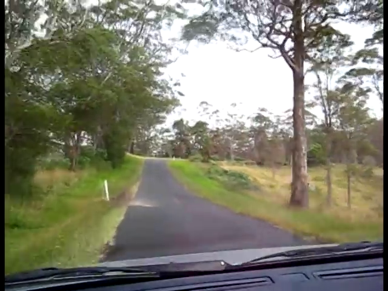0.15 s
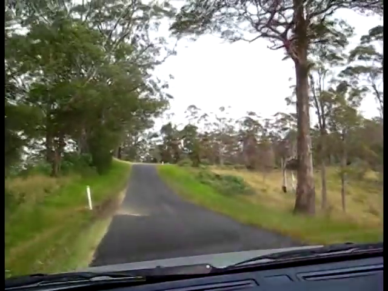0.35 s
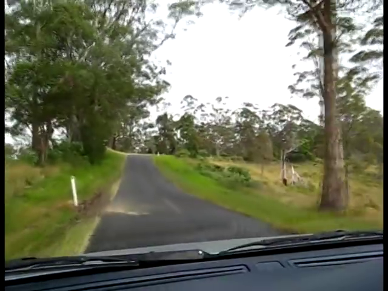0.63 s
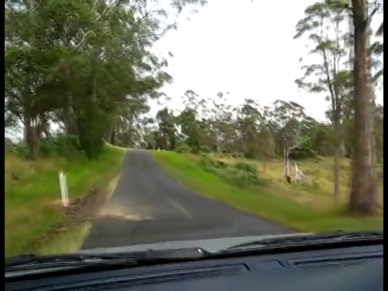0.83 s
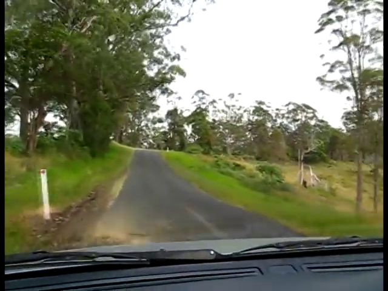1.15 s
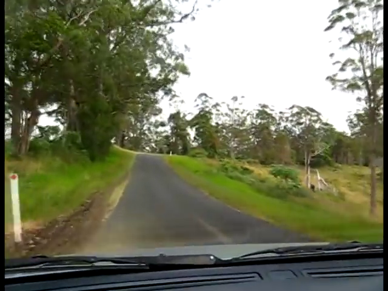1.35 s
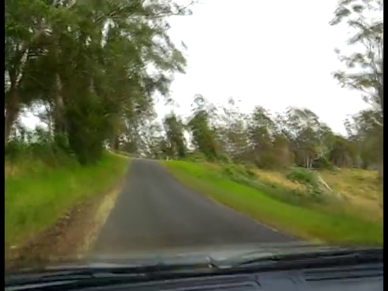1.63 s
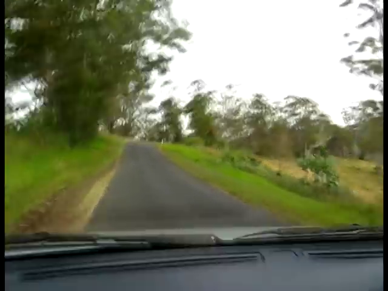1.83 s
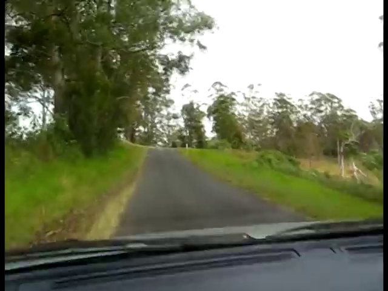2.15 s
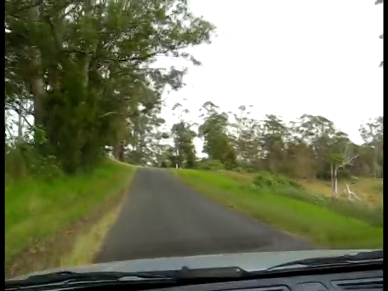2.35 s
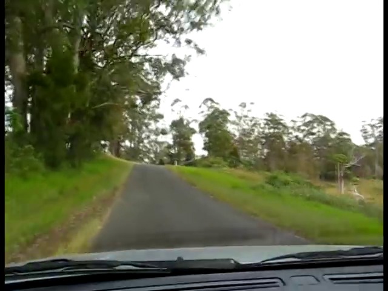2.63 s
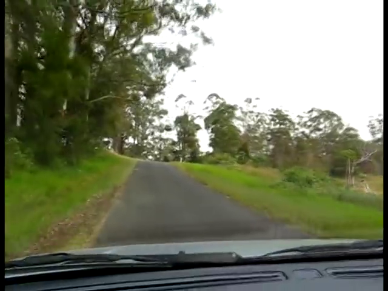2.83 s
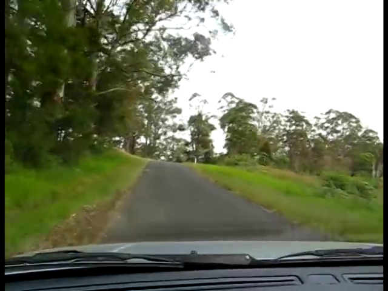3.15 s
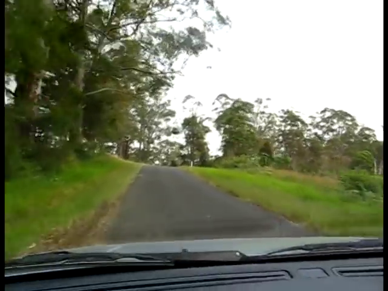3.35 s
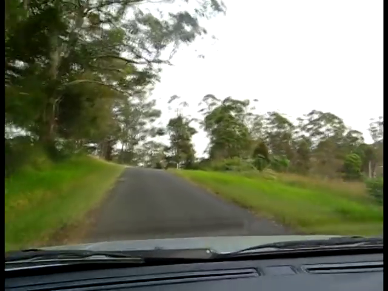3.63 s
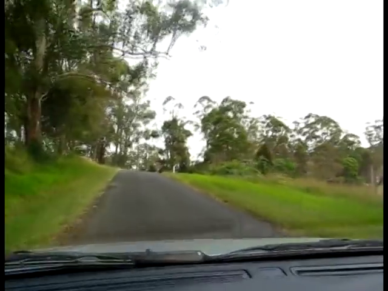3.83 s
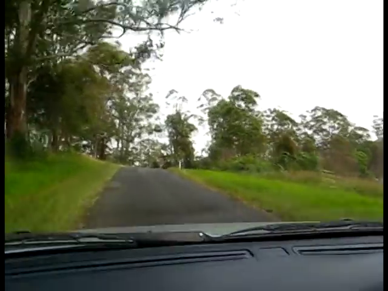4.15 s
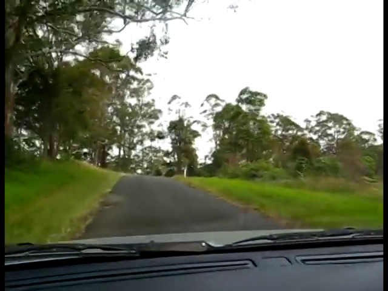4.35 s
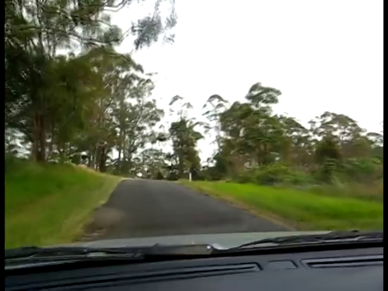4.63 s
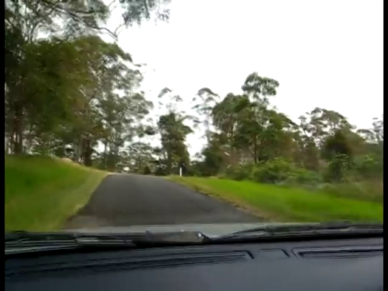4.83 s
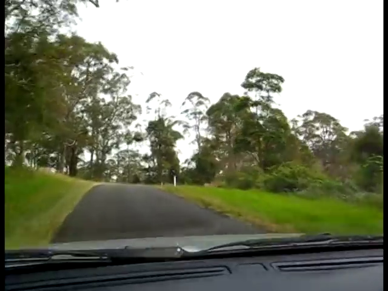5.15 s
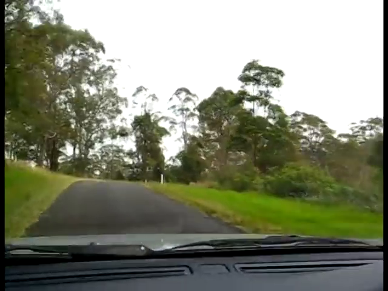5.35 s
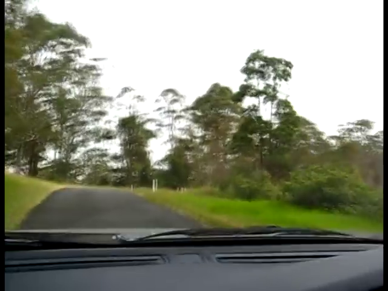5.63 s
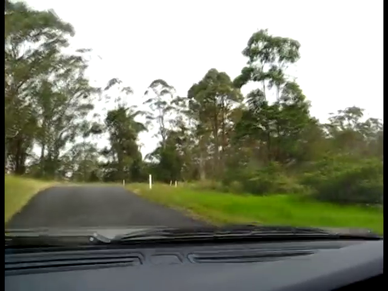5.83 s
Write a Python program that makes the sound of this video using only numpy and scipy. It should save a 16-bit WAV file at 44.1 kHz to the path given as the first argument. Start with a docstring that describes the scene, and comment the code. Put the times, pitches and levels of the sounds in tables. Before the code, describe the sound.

The sound is that of a small car's cabin on a country road, heard from the front seat for about six seconds. Deep body rumble, tyre roar on coarse asphalt and a low engine boom run throughout, with soft thuds from bumps and a faint hiss. At 0.4 seconds plastic clicks once, sharply and close by, and just before 1 second the dashboard ticks lightly. At about 1.6 seconds the wheels hit a rough patch: the tyres swell, hollow panels knock and loose trim rattles brightly, dying away just after 2 seconds. The overall level dips with the jolt and creeps back. From 2 seconds the engine grows louder and rises in pitch, with one more dull knock near 2.4 seconds. It drones steadily from 3 to 5 seconds, then eases off, with a faint rattle around 5.4 seconds and a last low swell.

```python
"""Inside a small car on a narrow country road, camera microphone at the front seat. From the start the
body rumbles, the tyres roar on coarse asphalt and the four-cylinder engine booms low. Close by, plastic
clicks once sharply, then the dashboard ticks. At about 1.6 s the wheels cross a rough patch: panels
knock, loose trim rattles, and the camera's gain control ducks and creeps back. After two seconds the
engine picks up and drones on up a rise, easing off shortly before the end."""
import sys
import numpy as np
from scipy import signal
from scipy.fft import rfft, irfft, next_fast_len
from scipy.io import wavfile
from scipy.ndimage import uniform_filter1d, map_coordinates

SR = 44100
rng = np.random.default_rng(int(sys.argv[2]) if len(sys.argv) > 2 else 0)


def unload_wav(signal):
    """Save mono or channel-first audio to the path in sys.argv[1] as 16-bit WAV at rate SR, clipped to [-1, 1]."""
    wavfile.write(
        sys.argv[1],
        SR,
        np.round(np.clip(np.atleast_2d(signal).T, -1, 1) * 32767).astype(np.int16),
    )


N = 263963


def amp(db):
    """Decibels to gain."""
    return 10 ** (np.asarray(db) / 20)


def unit(x):
    """Scale to rms 1."""
    return x / np.sqrt(np.mean(x ** 2) + 1e-20)


def curves(rows):
    """One value per sample for each column after the time."""
    times, *columns = np.transpose(rows)
    return [np.interp(np.arange(N) / SR, times, column) for column in columns]


def wobble(rate):
    """A smooth random curve, rate knots a second."""
    knots = rng.standard_normal(int(N * rate / SR) + 4)
    return map_coordinates(knots, [np.arange(N) * rate / SR])


def gain_at(spectrum, hz):
    """Gain between (frequency [Hz], level [dB]) points on a log axis."""
    points_hz, db = np.transpose(spectrum)
    return amp(np.interp(np.log(hz + 1), np.log(points_hz), db))


def filtered(x, response):
    """x through a complex response of frequency."""
    size = next_fast_len(N + SR // 2)
    return irfft(rfft(x, size) * response(np.fft.rfftfreq(size, 1 / SR)), size)[:N]


def coloured(x, spectrum):
    """x shaped by a spectrum and silent beyond its ends, at rms 1."""
    low_hz, high_hz = spectrum[0][0], spectrum[-1][0]
    return unit(filtered(x, lambda hz: gain_at(spectrum, hz) * (hz > low_hz) * (hz < high_hz)))


def noise(spectrum):
    """Noise with this spectrum, at rms 1."""
    return coloured(rng.standard_normal(N), spectrum)


def steady(x, span_s):
    """Even out swells of x that last longer than span_s."""
    power = np.abs(uniform_filter1d(x ** 2, int(span_s * SR)))
    return x / np.sqrt(power + 1e-6)


def lagged(x, seconds):
    """x followed with a time constant."""
    step = 1 - np.exp(-1 / (seconds * SR))
    return signal.lfilter([step], [1, step - 1], x)


def blows(hits):
    """One clean impulse for each (time [s], level [dB])."""
    times, db = np.transpose(hits)
    return np.bincount(np.round(times * SR).astype(int), amp(db), N)


def padded(x, corner_hz):
    """A soft contact carries little treble."""
    return filtered(x, lambda hz: 1 / (1 + 1j * hz / corner_hz) ** 2)


def struck(force, modes):
    """A force rings modes of alternating sign; a unit impulse peaks at 1."""
    hz = np.fft.rfftfreq(SR // 4, 1 / SR)
    response = sum((-1) ** k * amp(db) * 1j * hz * width / (centre ** 2 - hz ** 2 + 1j * hz * width)
                   for k, (centre, width, db) in enumerate(modes))
    ring = irfft(response)
    return signal.fftconvolve(force, ring / np.abs(ring).max())[:len(force)]


# the body shaking all around the microphone: (frequency [Hz], relative density [dB])
SHAKE_SPECTRUM = [(8, -29), (18, -7.5), (26, -1.5), (33, -1.5), (41, 8.5), (50, 0.5), (62, -9.5), (90, -19),
                  (200, -68.5)]
# the body heaves and settles over long waves in the road: (time [s], extra shake [dB])
BODY_HEAVES = [(.1, 4.5), (.35, 4), (.68, 7.5), (1.28, 9), (1.49, 1), (1.82, -2), (1.93, 13), (2.01, 3.5),
               (2.11, 0.5), (2.19, -11), (2.46, -9), (3.37, 3), (4.801, 6), (5.48, 6), (5.75, -2)]


def body_shake():
    """Unevenness comes up through the springs as a deep shake that swells with each heave."""
    t = np.arange(N) / SR
    mean_db, heave_half_s = -21.5, 0.034
    heave_db = sum(db * np.exp(-((t - s) / heave_half_s) ** 2) for s, db in BODY_HEAVES)
    shake_db = mean_db + heave_db + 2.7 * wobble(15)
    return amp(shake_db) * steady(noise(SHAKE_SPECTRUM), span_s=0.086)


# how hard the asphalt drives the wheels, by speed and coarseness: (time [s], roar [dB], rumble [dB])
ASPHALT_DRIVE = [(0, -26.5, -17.5), (.13, -32.5, -24.5), (.2, -34, -26), (.31, -31.5, -18.5),
                 (.48, -32.5, -26), (.75, -29.5, -20), (1.05, -28, -18), (1.35, -29, -19.5),
                 (1.59, -30.5, -21.5), (1.7, -22, -12.5), (1.745, -22, -15), (1.8, -27.5, -18.5),
                 (1.92, -24.5, -17), (2.0, -28.5, -21), (2.1, -32, -26), (2.22, -30.5, -20.5),
                 (2.35, -25, -18), (2.8, -26.5, -19.5), (3.1, -26.5, -15), (3.3, -28, -20), (3.7, -26, -16),
                 (4, -28.5, -20.5), (4.45, -24.5, -14), (4.75, -26, -18), (5.36, -29, -19.5),
                 (5.48, -33, -22), (5.99, -28.5, -20)]
# the road as heard inside the cabin: (frequency [Hz], relative density [dB])
RUMBLE_SPECTRUM = [(40, -27), (65, -7), (85, -3), (103, 3.5), (120, -3), (145, -0.5), (170, -3), (215, -7),
                   (255, -5.5), (310, -10), (400, -9), (500, -27.5), (900, -60.5)]


def road_rumble():
    """The asphalt drives a hollow rumble through the springs into the cabin."""
    _, rumble_db = curves(ASPHALT_DRIVE)
    return amp(rumble_db + 0.68 * wobble(14)) * steady(noise(RUMBLE_SPECTRUM), span_s=0.08)


# the wheels drop over bumps: (time [s], thud force [dB], tyre slap [dB])
ROAD_BUMPS = [(.125, -6.5, -31), (0.829, -9, -35), (.965, -8, -28.5), (1.01, -13, -32.5), (1.641, -12, -32),
              (1.659, -9, -28.5), (1.674, -2, -20), (1.725, -9, -35), (1.752, -11.5, -35),
              (1.914, -12, -28), (1.991, -6.5, -33), (2.28, -9.5, -36), (2.365, -4, -26), (2.48, -10, -29),
              (2.756, -7.5, -33), (2.92, -7.5, -33.5), (3.11, -8, -28), (3.283, -12.5, -34),
              (4.199, -9, -34), (4.45, -9.5, -25), (4.936, -6.5, -29), (5.04, -10, -30), (5.151, -3, -28),
              (5.659, -12.5, -30.5)]
# the floor pan, below the microphone: (frequency [Hz], width [Hz], relative level [dB])
FLOOR_MODES = [(93, 60, -1), (148, 41, -0.5), (204, 22, -4)]


def bumps():
    """Each bump thuds through the springs into the floor pan."""
    force = blows([(s, db) for s, db, _ in ROAD_BUMPS])
    return padded(struck(force, FLOOR_MODES), corner_hz=332)


# the tyres outside, heard from the seat: (frequency [Hz], relative density [dB])
ROAR_SPECTRUM = [(200, -13), (370, -8.5), (450, 6.5), (520, 0), (600, 3.5), (660, 0), (720, 3), (800, 5),
                 (880, 2), (960, 3.5), (1040, -4), (1130, -5), (1250, -8.5), (1550, -12), (1635, -12),
                 (1710, -13.5), (1900, -19), (2400, -22), (2800, -27), (4000, -30.5), (7000, -63.5)]
# their hiss through the glass: (frequency [Hz], relative density [dB])
TYRE_HISS_SPECTRUM = [(500, -10.5), (1500, 7), (2400, 4), (2900, -0.5), (3500, 0), (4300, -11.5),
                      (5000, -11.5), (5700, -15), (6400, -22.5), (7300, -25.5), (8200, -29.5), (10000, -24),
                      (15000, -22)]


def tyres():
    """Tread drums on stone chips and slaps on bumps; a thin hiss follows the roar loosely."""
    t = np.arange(N) / SR
    slap_half_s = 0.01
    mean_hiss_db, hiss_db_per_roar_db = -49, 0.54
    roar_db, _ = curves(ASPHALT_DRIVE)
    roar_db += 1.1 * wobble(12)
    slaps = sum(amp(db) * np.exp(-((t - s) / slap_half_s) ** 2) for s, _, db in ROAD_BUMPS)
    chips = rng.standard_normal(N) * amp(0.94 * wobble(70))
    roar = np.hypot(amp(roar_db), slaps) * coloured(chips, ROAR_SPECTRUM)
    hiss_db = mean_hiss_db + hiss_db_per_roar_db * (roar_db - roar_db.mean()) + 0.77 * wobble(27)
    return roar + amp(hiss_db) * noise(TYRE_HISS_SPECTRUM)


def crank_tones(turns, orders, flutter_db):
    """Tones at multiples of the crankshaft speed, each a little unsteady in level and phase."""
    drift_rad = 0.15
    tones = np.zeros(N)
    for order, db in orders:
        level = amp(db + flutter_db * wobble(7))
        phase = 2 * np.pi * (order * turns + rng.random()) + drift_rad * wobble(5.3)
        tones += level * np.sin(phase)
    return unit(tones)


# the crankshaft: (time [s], speed [turns/s])
CRANK_SPEED = [(0, 24), (.9, 25.5), (1.8, 26), (2.3, 29.7), (2.8, 32.2), (3.05, 34.3), (3.4, 34.85),
               (4.75, 34.5), (5.12, 34.65), (5.35, 34), (6, 31.3)]
# how hard the engine pulls: (time [s], boom level [dB])
ENGINE_LOAD = [(0, -40), (.9, -26), (1.85, -32), (2.3, -22), (3.2, -22.5), (5.1, -20.5), (5.5, -35),
               (5.99, -17)]
# low boom and higher drone at the front seat: (order [cycles/turn], relative level [dB])
BOOM_ORDERS = [(2, 1), (3, -21), (4, 5.5), (5, -20.5), (7, -24), (8, -9.5)]
DRONE_ORDERS = [(10, -8), (11, 0), (12, -1.5)]


def engine():
    """Two firings a turn boom in the cabin; higher orders drone under load at speed."""
    speed, = curves(CRANK_SPEED)
    boom_db, = curves(ENGINE_LOAD)
    under_boom_db, db_per_turn_per_s = 4.8, 1.4  # the drone fades below top speed
    drone_db = boom_db - under_boom_db + db_per_turn_per_s * (speed - speed.max())
    turns = np.cumsum(speed) / SR
    boom = amp(boom_db) * crank_tones(turns, BOOM_ORDERS, flutter_db=1.8)
    drone = amp(drone_db) * crank_tones(turns, DRONE_ORDERS, flutter_db=1.5)
    return boom + drone


# contacts of a light tick, just ahead of the microphone: (time [s], level [dB])
TICK_CONTACTS = [(.9456, -20.5), (.9509, -22), (.9563, -30)]
# the ticking part: (frequency [Hz], width [Hz], relative level [dB])
DASHBOARD_MODES = [(1830, 140, 2), (2180, 100, 8), (2520, 180, -5), (3260, 100, 1), (3950, 250, -14),
                   (7800, 600, -32)]


def dashboard_tick():
    """A small dashboard part taps, bounces and rings on."""
    return struck(blows(TICK_CONTACTS), DASHBOARD_MODES)


# contacts of one sharp click, close by in the cabin: (time [s], level [dB])
CLICK_CONTACTS = [(.3946, -8), (.3970, -12.5), (.3993, -18), (.4016, -14.5)]
# the clicking part: (frequency [Hz], width [Hz], relative level [dB])
CLICK_MODES = [(850, 126, 8.5), (1380, 98, 7.5), (1920, 95, -6.5), (2560, 220, -10.5), (3150, 180, -10),
               (3900, 180, -10), (4200, 150, -12.5), (5170, 320, -19.5), (5760, 580, -27), (7200, 400, -33)]


def plastic_click():
    """A stiff plastic part snaps and bounces within a few milliseconds."""
    return struck(blows(CLICK_CONTACTS), CLICK_MODES)


# knocks in the cabin: (time [s], force [dB], contact corner [Hz])
PANEL_KNOCKS = [(.133, -14, 1600), (1.338, -16, 1400), (1.604, -17, 1510), (1.638, -6, 1900),
                (1.6595, -17, 2200), (1.6708, -1, 1500), (1.696, -7, 1200), (1.737, -14, 1200),
                (1.7519, 4, 620), (1.803, -17, 2190), (2.364, -9, 1400)]
# the panel behind the trim: (frequency [Hz], width [Hz], relative level [dB])
PANEL_MODES = [(273, 51, 6), (455, 110, 4), (680, 140, -0.5), (950, 260, -0.5), (1170, 250, -4.5)]


def panel_knocks():
    """The harder jolts knock a hollow panel; a softer contact sounds duller."""
    force = sum(padded(blows([(s, db)]), corner_hz) for s, db, corner_hz in PANEL_KNOCKS)
    return struck(force, PANEL_MODES)


def chatter(t60, strike_db):
    """One clean strike and a dying burst of tiny contacts, with energy 1."""
    contacts_per_s, stiff_s = 9000, 0.014
    t = np.arange(SR // 4) / SR
    contacts = rng.standard_normal(len(t)) * (rng.random(len(t)) < contacts_per_s / SR)
    burst = contacts * amp(-60 * t / t60)
    burst /= np.linalg.norm(burst) + 1e-12
    burst[0] += amp(strike_db) * min(1, stiff_s / t60)  # longer rattles start with a weaker strike
    return burst / np.linalg.norm(burst)


# loose trim near the microphone: (time [s], ring [dB], crackle [dB], t60 [s], pitch [ratio])
TRIM_RATTLES = [(.135, -28, -43, 0.054, 0.96), (.921, -30.5, -43, 0.032, 1), (.997, -28.5, -49, .03, 0.74),
                (1.065, -27.5, -41, 0.079, 0.89), (1.432, -26, -35, .16, 1.04),
                (1.6385, -26, -38, 0.049, 1.17), (1.644, -27.5, -34.5, 0.022, 1),
                (1.6612, -22.5, -31, .04, 1.05), (1.674, -17, -29, 0.065, 1.16),
                (1.6805, -15, -30, .022, .98), (1.689, -13.5, -38, .12, 1), (1.703, -19.5, -35, .08, 1),
                (1.7222, -16, -19, .022, 1.03), (1.729, -17, -27, 0.1, .98), (1.751, -13.5, -27, 0.028, 1),
                (1.756, -10.5, -19, .024, 1), (1.765, -19, -32, .04, 1.1), (1.797, -24.5, -39, .2, .9),
                (1.881, -22, -29, .11, 1.18), (1.94, -20, -31, .2, 0.95), (1.974, -22.5, -33, .2, 0.88),
                (2.002, -22, -37, .09, 0.88), (5.38, -25, -41, 0.092, 0.9)]
# the trim's ring and its bright edges: (frequency [Hz], width [Hz], relative level [dB])
TRIM_MODES = [(1840, 130, 7), (2270, 170, 2), (2610, 260, -5), (3294, 250, -1), (4140, 450, -9.5)]
EDGE_MODES = [(4280, 360, 6.5), (5700, 1700, -3.5), (6960, 900, -13.5)]


def trim_rattles():
    """Jolts make loose plastic clack, ring and chatter on briefly; smaller pieces ring higher."""
    out = np.zeros(N + SR)
    for s, ring_db, crackle_db, t60, pitch in TRIM_RATTLES:
        piece = [(hz * pitch, width, db) for hz, width, db in TRIM_MODES]
        clack = amp(ring_db) * struck(chatter(t60, strike_db=-4), piece)
        crackle = amp(crackle_db) * struck(chatter(t60, strike_db=-14), EDGE_MODES)
        out[round(s * SR):][:len(clack)] += clack + crackle
    return out[:N]


def scene():
    """Everything as heard from the front seat, in mono."""
    driving = engine() + body_shake() + road_rumble() + bumps() + tyres()
    close_by = dashboard_tick() + plastic_click() + panel_knocks() + trim_rattles()
    return (driving + close_by)[None]


def gain_control(x):
    """Sharp sounds over the threshold pull the gain down; it climbs back at a steady rate."""
    sense_hz, threshold_db = 780, -28.5
    sense_s, attack_s, release_db_per_s = 0.012, 0.018, 28
    sensed = signal.sosfilt(signal.butter(2, sense_hz, "highpass", fs=SR, output="sos"), x)
    sensed_db = 10 * np.log10(lagged(sensed ** 2, sense_s) + 1e-12)
    over_db = np.maximum(sensed_db - threshold_db, 0)
    climb_db = release_db_per_s * np.arange(N) / SR
    cut_db = np.maximum.accumulate(over_db + climb_db) - climb_db
    return x * amp(-lagged(cut_db, attack_s))


# the camera's own hiss: (frequency [Hz], relative density [dB])
CAMERA_HISS_SPECTRUM = [(800, -1.5), (3500, 0), (5000, -5.5), (6400, -16.5), (8200, -26.5), (15000, -4)]
# its microphone's treble roll-off: (frequency [Hz], gain [dB])
MIC_RESPONSE = [(20, 0.5), (6000, 0), (7600, -1), (8600, -9), (11000, -30.5), (15000, -46.5)]


def record(dry):
    """A small camera rides its gain, adds faint hiss, rounds off peaks and keeps little top treble."""
    hiss_db, ceiling, top_hz = -54, 0.8, 15200
    x = gain_control(dry[0]) + amp(hiss_db) * noise(CAMERA_HISS_SPECTRUM)
    rounded = x / (1 + np.abs(x / ceiling) ** 6) ** (1 / 6)
    return filtered(rounded, lambda hz: gain_at(MIC_RESPONSE, hz) * (hz < top_hz))[None]


dry = scene()
out = record(dry)
unload_wav(out)
```